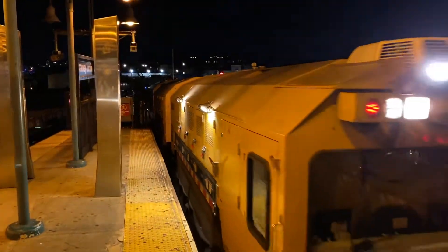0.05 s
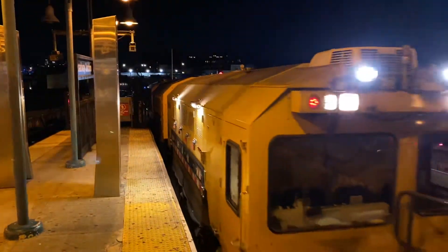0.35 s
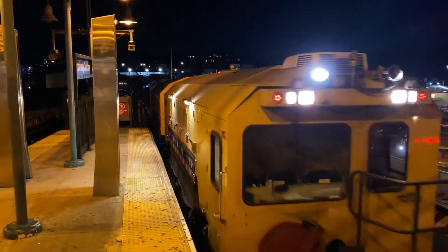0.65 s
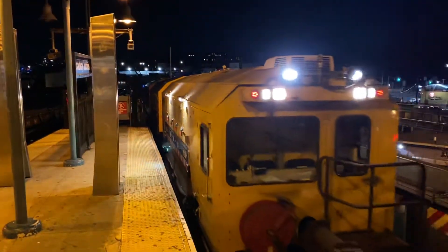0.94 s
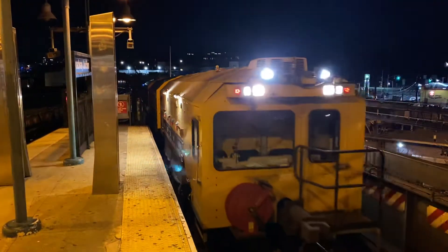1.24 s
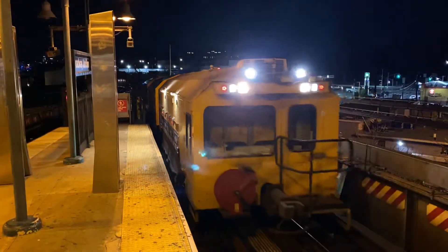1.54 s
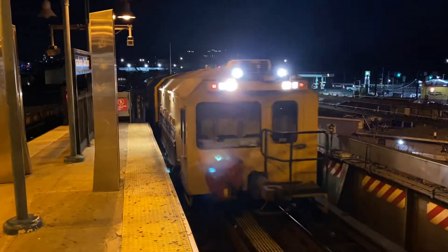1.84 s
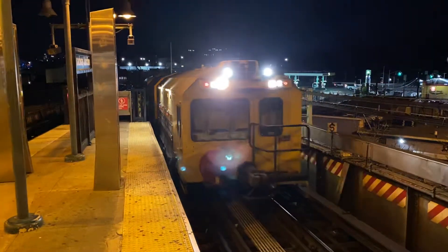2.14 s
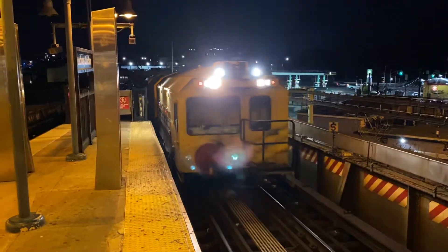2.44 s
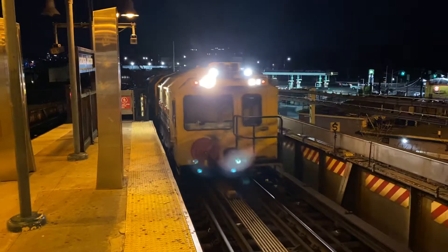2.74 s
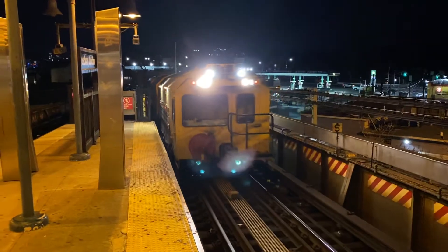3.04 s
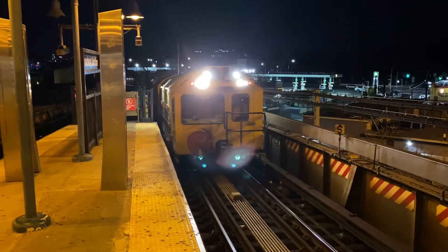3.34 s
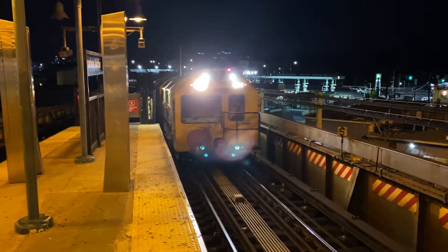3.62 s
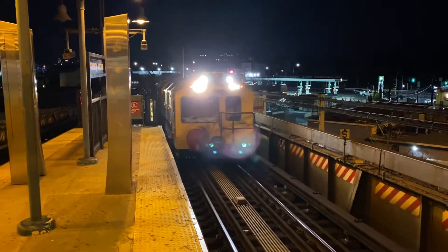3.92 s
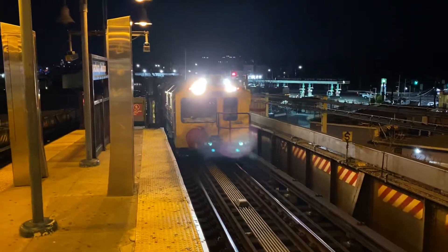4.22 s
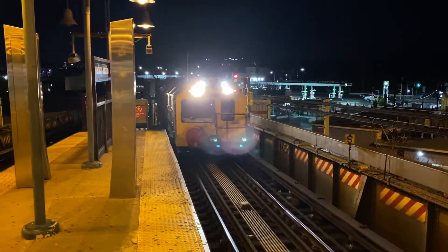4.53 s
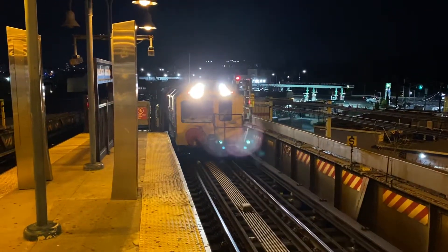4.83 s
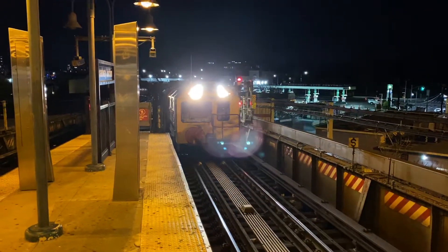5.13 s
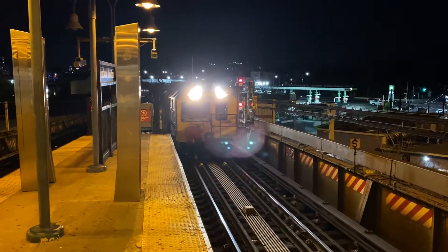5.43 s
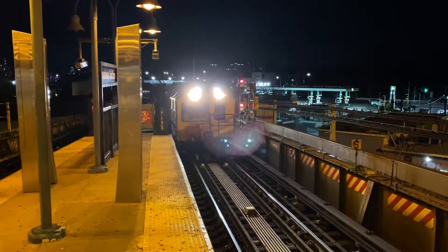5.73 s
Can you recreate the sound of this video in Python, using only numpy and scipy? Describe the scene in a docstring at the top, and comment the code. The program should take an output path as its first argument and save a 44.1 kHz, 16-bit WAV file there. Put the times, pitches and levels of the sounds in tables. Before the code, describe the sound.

A diesel work train rolls away from an open-air platform, its engine droning and whining over rumbling, hissing wheels. The wheels crash over four rail joints about a second apart, each with a deep boom and a metallic ring, while steel clinks and flanges squeak briefly. From about two seconds on, wind sputters on the microphone in gusts and puffs as the train grows fainter.

```python
"""A diesel engine drones and whines over rumbling wheels: a work train rolls away from an open platform
at night. Its wheels crash over rail joints, the treble running ahead through the rail; each blow booms
and sets the wheel ringing, and the first three also groan. Steel clinks and flanges squeak. From about
two seconds on, as the train recedes, wind sputters on the microphone in gusts and puffs."""
import sys
import numpy as np
from scipy.fft import rfft, irfft, next_fast_len
from scipy.io import wavfile
from scipy.ndimage import map_coordinates

SR = 44100
rng = np.random.default_rng(int(sys.argv[2]) if len(sys.argv) > 2 else 0)


def unload_audio(sound):
    """Save the sound as a 16-bit wav file, at the path given as the first command line argument."""
    columns = np.transpose(np.atleast_2d(sound))
    # keep every value between -1 and 1, then stretch to whole-number steps
    steps = np.round(np.clip(columns, -1, 1) * 32767)
    wavfile.write(sys.argv[1], SR, steps.astype(np.int16))


N = 254456
TIME_S = np.arange(N) / SR


def amp(db):
    """Decibels to gain."""
    return 10 ** (np.asarray(db) / 20)


def unit(x):
    """Scale to rms 1."""
    return x / np.sqrt(np.mean(x ** 2) + 1e-20)


def along(points, hz):
    """Read (freq_hz, value) points on a log frequency axis."""
    freqs, values = np.transpose(points)
    return np.interp(np.log(hz + 1), np.log(freqs + 1), values)


def eq(points):
    """A frequency response through (freq_hz, gain_db) points."""
    return lambda hz: amp(along(points, hz))


def automation(rows):
    """One curve for each column after the time."""
    times, *columns = np.transpose(rows)
    return [np.interp(TIME_S, times, column) for column in columns]


def wobble(rate):
    """A smooth random curve with rate knots a second."""
    return map_coordinates(rng.standard_normal(int(N * rate / SR) + 4), [np.arange(N) * rate / SR])


def filtered(x, response):
    """Apply a frequency response."""
    size = next_fast_len(N + SR // 2)
    return irfft(rfft(x, size) * response(np.fft.rfftfreq(size, 1 / SR)), size)[..., :N]


def stereo(pair, side_db):
    """Mid and side to left and right."""
    side = pair[1] * amp(side_db)
    return np.array([pair[0] + side, pair[0] - side])


def receding(start_db, loss_db, start_m=7.33, speed_m_per_s=2.91):
    """Level in dB of a source on the train: it loses loss_db for each doubling of the distance."""
    return start_db - loss_db * np.log2(1 + speed_m_per_s * TIME_S / start_m)


def screened(midpoint_s=3.74, spread_s=0.089, depth_db=7):
    """Level change in dB as the engine slips behind the platform's end."""
    return -depth_db * (1 + np.tanh((TIME_S - midpoint_s) / spread_s / 2)) / 2


# Low end of wind buffet and ground rumble: freq_hz, gain_db
DEEP_EQ = [(18, -15), (30, -10), (42, 10.5), (60, 20), (85, 10), (130, 8.5), (250, -63)]
def deep_noise():
    """Noise in the lowest bass, nearly alike in both ears."""
    return stereo(unit(filtered(rng.standard_normal((2, N)), eq(DEEP_EQ))), side_db=-8)


def eddies(starts_s, hz, size, cycles, port_spread):
    """Each eddy is a brief pressure swing that slows as it dies and meets the two mic ports unequally."""
    n = np.arange(SR // 25)
    skew = port_spread * rng.standard_normal((len(starts_s), 2))  # in gain and in phase
    age = hz[:, None] * n / SR  # in cycles
    phase = 4 * np.pi * np.log1p(age / 2)
    taper = np.cos(np.pi / 2 * n / len(n))
    envelope = size[:, None] * 2 * age / cycles * np.exp(1 - 2 * age / cycles) * taper
    index = ((starts_s * SR).astype(int)[:, None] + n).ravel()
    sign = rng.choice([-1, 1], (len(starts_s), 1))
    ports = [sign * envelope * np.exp(side * skew[:, :1] / 2) * np.sin(phase + side * skew[:, 1:])
             for side in (1, -1)]
    return np.array([np.bincount(index, port.ravel(), N)[:N] for port in ports])


def sputter(level_db, pitch_hz, scatter, count):
    """A stream of eddies of random pitch whose strength follows the gusts."""
    at = ((np.arange(count) + rng.uniform(0, 1, count)) / count * (N - 1)).astype(int)
    detune = np.exp(scatter * np.clip(rng.standard_normal(count), -2, 2))
    size = unit(amp(3.4 * np.minimum(rng.exponential(1, count), 3))) * detune ** -.3
    hz = np.broadcast_to(pitch_hz, N)[at] * detune
    return eddies(at / SR, hz, size * amp(level_db[at]), cycles=1.02, port_spread=0.63)


# Gusts on the mic: peak_s, half_length_s, buffet_db, large_eddy_db, small_eddy_db, small_eddy_hz
GUSTS = [(1.91, 0.11, -33, -29.5, -25.5, 384), (2.736, 0.049, -20, -21.5, -23.5, 375),
         (2.89, 0.25, -36, -18.5, -25, 378), (3.12, 0.029, -36, -29, -26, 332),
         (3.41, 0.08, -31, -15.5, -24.5, 405), (3.636, 0.19, -30, -19, -27.5, 360),
         (4.007, 0.17, -51, -44, -24, 377), (4.46, 0.2, -54, -27.5, -29, 476),
         (4.786, 0.052, -41, -24.5, -39, 587), (5.195, 0.0098, -46, -21, -50, 550),
         (5.456, 0.081, -43, -23, -20.5, 570), (5.634, 0.0088, -45, -17, -17, 690),
         (5.728, 0.046, -56, -18.5, -20, 770)]
def wind():
    """Each gust swells and fades, bringing a deep buffet and a stream of large and small eddies."""
    peak_s, half_s, buffet_db, large_db, small_db, small_hz = np.transpose(GUSTS)
    swell = 1 / (1 + ((TIME_S - peak_s[:, None]) / half_s[:, None]) ** 2) ** 2
    level = lambda db: 10 * np.log10(amp(db) ** 2 @ swell)  # gusts add in power
    large = sputter(level(large_db), pitch_hz=207, scatter=0.36, count=850)
    small = sputter(level(small_db), small_hz @ swell / swell.sum(axis=0), scatter=0.29, count=1200)
    return deep_noise() * amp(level(buffet_db)) + large + small


# Single pops of wind: start_s, base_level_db, base_pitch_hz
PUFFS = [(1.877, -19, 265), (1.927, -24, 250), (2.719, -16, 252), (2.767, -30, 275), (2.791, -19, 240),
         (2.9, -15.5, 318), (2.953, -26, 250), (2.99, -18.5, 292), (3.35, -17.5, 300), (3.416, -16.5, 260),
         (3.435, -18.5, 280), (3.598, -18, 248), (3.665, -25, 244), (4.078, -28, 282), (4.205, -36, 330),
         (4.436, -28.5, 413), (4.518, -25.5, 413), (4.637, -20.5, 393), (4.692, -21, 430),
         (4.746, -35, 373), (4.787, -24, 356), (5.186, -27, 350), (5.279, -27, 350), (5.44, -23, 300),
         (5.453, -22, 520), (5.636, -24, 380), (5.68, -23, 326), (5.731, -22.5, 543)]
def puffs():
    """A strong puff is one eddy with a smaller, quicker one at its front."""
    start_s, db, hz = np.transpose(PUFFS)
    front = eddies(start_s, hz * 1.7, amp(db - 5), cycles=1.1, port_spread=.3)
    body = eddies(start_s, hz * 1.244, amp(db + 5), cycles=1.28, port_spread=0.45)
    return front + body


# Stereo width of the steel: freq_hz, side_gain_db
STEEL_WIDTH = [(60, -14), (200, -11), (700, -6.5), (1400, -3.5), (2400, -4), (4400, -3), (6000, -1.5),
               (8000, -6), (10000, -13)]
def steel_noise(colour, ripple_db, spacing_hz):
    """Mid and side noise rung through dense, irregular resonances; the mid has rms 1."""
    def response(hz):
        place = np.log1p(hz / 2500) * 2500 / spacing_hz  # resonances thin out in the treble
        modes = [map_coordinates(rng.standard_normal(int(place[-1]) + 4), [place]) for _ in range(2)]
        width = [np.ones_like(hz), amp(along(STEEL_WIDTH, hz))]
        return colour(hz) * amp(ripple_db * np.array(modes)) * width
    pair = filtered(rng.standard_normal((2, N)), response)
    return pair / np.std(pair[0])


ROAR_DB, ROAR_LOSS_DB = -27, 6.5
# Body of the rolling bed: freq_hz, gain_db
ROAR_EQ = [(120, -30.5), (200, -7), (280, -8.5), (400, -12), (700, -15.5), (1130, -24.5), (1580, -22.5),
           (1800, -26.5), (2200, -25.5), (2600, -31), (3200, -37), (6000, -62)]
# Hiss of wheel on rail: freq_hz, gain_db
HISS_EQ = [(1500, -30), (3200, -1), (4600, 1.5), (5300, -3), (7300, -1.5), (8600, -8), (10500, -11),
           (11500, -16), (14000, -17), (15000, -22), (15700, -36)]
# Top of the hiss, soon lost in the air: freq_hz, gain_db
SIZZLE_EQ = [(5000, -30), (7500, 0), (10000, -1), (12000, -6), (14500, -3), (15600, -20)]
def rolling():
    """Rough wheels shake rails, cars and ground; the sound grows fainter and wider with distance."""
    roar = steel_noise(eq(ROAR_EQ), ripple_db=1.5, spacing_hz=16)
    hiss = steel_noise(eq(HISS_EQ), ripple_db=2.3, spacing_hz=15)
    roar *= amp(receding(ROAR_DB, ROAR_LOSS_DB) + wobble(16))
    hiss *= amp(receding(-49.5, loss_db=8) + wobble(20) + 0.2 * wobble(3.6))
    sizzle = steel_noise(eq(SIZZLE_EQ), ripple_db=2, spacing_hz=15)
    sizzle *= amp(receding(-58.5, loss_db=13.5) + wobble(20))
    ground = deep_noise() * amp(receding(-28, loss_db=3.5) + screened() + 2.5 * wobble(6.46))
    side_db = -0.2 - 4.8 * np.exp(-TIME_S / 0.41)
    return stereo(roar + hiss + sizzle, side_db) + ground


def tone(phase, flutter, side_db, flutter_hz=9):
    """A tone whose strength and direction flutter as its reflections shift."""
    reflections = np.array([wobble(flutter_hz) + 1j * wobble(flutter_hz) for _ in range(2)])
    paths = flutter * reflections + [[1], [0]]  # the direct sound is in the mid only
    pair = np.real(paths * np.exp(1j * (phase + rng.uniform(0, 2 * np.pi))))
    return stereo(pair / np.std(pair[0]), side_db)


def shaft_phase(drift, drift_hz):
    """Phase of a 1 Hz rotation whose speed wanders slightly."""
    return 2 * np.pi * np.cumsum(1 + drift * wobble(drift_hz)) / SR


CRANK_HZ = 29.87
# Exhaust fader moves while the engine is close: time_s, second_order_db, third_order_db
EXHAUST_LEVELS = [(0.0, -24.5, -25), (0.3, -29, -29.5), (0.62, -27.5, -21), (1.1, -28.5, -26),
                  (1.55, -22.5, -30), (1.8, -30, -33), (2.4, -29, -31.5)]
# Exhaust notes: crank_multiple, fade_db_per_s
EXHAUST_ORDERS = [(2, 7.5), (3, 9)]
def exhaust(turn):
    """The exhaust drones on two crank orders, which fade once the engine has passed."""
    passed_s = np.maximum(TIME_S - EXHAUST_LEVELS[-1][0], 0)
    return sum(amp(db - fade * passed_s + screened())
               * tone(order * CRANK_HZ * turn, flutter=0.08, side_db=-0.5)
               for (order, fade), db in zip(EXHAUST_ORDERS, automation(EXHAUST_LEVELS)))


# Rumble of the casing: freq_hz, gain_db
CASING_EQ = [(35, -9.5), (60, 7), (90, 6), (130, 7), (175, 12), (230, -3), (400, -70)]
# Hum within that rumble: crank_multiple, relative_db
CASING_ORDERS = [(4, -11), (5, -15), (6, -15), (7, -18), (8, -15)]
def casing(turn):
    """The engine casing rumbles and hums at multiples of the crank speed."""
    rumble = stereo(steel_noise(eq(CASING_EQ), ripple_db=4, spacing_hz=10.9), side_db=-10)
    hum = sum(amp(db) * tone(order * CRANK_HZ * turn, flutter=0.73, side_db=-4)
              for order, db in CASING_ORDERS)
    return amp(receding(-26, loss_db=2.5) + screened()) * (rumble + hum)


# Engine tones that carry far: pitch_hz, relative_db
UPPER_TONES = [(268.8, 2), (358.4, -8.5), (537, -16)]
# Their fader moves: time_s, gain_db
UPPER_SWELL = [(0, -5.5), (1.7, -1.5), (2.2, 2), (4.1, 7), (4.5, -16)]
def upper_tones(turn):
    """Higher tones swell once the engine's end faces the platform, then drop away."""
    tones = sum(amp(db) * tone(hz * turn, flutter=0.91, side_db=-10, flutter_hz=22)
                for hz, db in UPPER_TONES)
    return amp(receding(ROAR_DB - 8, ROAR_LOSS_DB) + automation(UPPER_SWELL)[0]) * tones


# Fan harmonics: blade_rate_multiple, relative_db
FAN_ORDERS = [(1, -2.5), (4, -11.5), (5, -13), (6, -15.5), (8, -22), (9, -18)]
def fan(blade_hz=173.4):
    """The cooling fan whines at multiples of its blade rate."""
    phase = blade_hz * shaft_phase(drift=0.003, drift_hz=4)
    whine = sum(amp(db + 2.5 * wobble(2.4)) * tone(order * phase, flutter=0.73, side_db=2, flutter_hz=14)
                for order, db in FAN_ORDERS)
    return amp(receding(ROAR_DB - 7, ROAR_LOSS_DB + 1)) * whine


# Gear whine: pitch_hz, start_level_db
GEAR_TONES = [(1335, -54), (1615, -58), (2939, -66), (3478, -67), (6600, -79)]
def gears(turn):
    """The gears add a thin whine that fades with distance."""
    whine = sum(amp(db) * tone(hz * turn, flutter=0.8, side_db=1) for hz, db in GEAR_TONES)
    return amp(receding(0, loss_db=7)) * whine


def engine():
    """The diesel: all but the fan follows one slightly unsteady crank."""
    turn = shaft_phase(drift=0.001187, drift_hz=3)
    return exhaust(turn) + casing(turn) + upper_tones(turn) + fan() + gears(turn)


# Flanges rubbing the rail: peak_s, half_length_s, pitch_hz, half_width_ratio, level_db
SQUEAKS = [(0.127, 0.012, 3160, .012, -42.5), (0.165, 0.012, 3120, .015, -47),
           (0.411, .024, 1440, .3, -30.5), (0.433, 0.014, 2800, 0.33, -36.5), (1.449, .008, 4600, .05, -41),
           (2.596, 0.03, 2700, .4, -33), (3.779, 0.033, 2170, 0.47, -35.5), (4.032, 0.016, 4020, .035, -55),
           (4.035, .025, 7000, .03, -62), (5.36, 0.071, 4770, .55, -54)]
def squeaks(chatter_db=3):
    """The flange sticks and slips: a rough noise band, narrow for a squeak and broad for a scrape."""
    sound = np.zeros((2, N))
    for peak_s, half_s, hz, width, db in SQUEAKS:
        band = filtered(rng.standard_normal((2, N)), lambda f: 1 / (1 + ((f - hz) / (width * hz)) ** 4))
        rub = unit(band * amp(chatter_db * wobble(350)))
        swell = np.exp(-((TIME_S - peak_s) / half_s) ** 2)
        sound += amp(db) * swell * stereo(rub, side_db=-6)
    return sound


def contact(start_s, rise_s, hold_s, decay_s, sag_db=4, full_hold_s=0.064):
    """Envelope of a steel contact: it swells, sags and rings out; a tap dies sooner than a full blow."""
    age = TIME_S - start_s
    held_db = sag_db * (.5 - np.clip((age - rise_s) / hold_s, 0, 1))
    t60_s = decay_s * np.sqrt(hold_s / full_hold_s)
    release_db = -60 * np.maximum(age - rise_s - hold_s, 0) / t60_s
    return np.clip(age / rise_s, 0, 1) * amp(held_db + release_db)


# Rail groans at the first three joint hits: start_s, hold_s, level_db, start_hz, end_hz
GROANS = [(0.388, 0.083, -26, 615, 303), (1.395, 0.039, -21, 703, 339.3), (2.544, 0.024, -23.5, 1000, 602),
          (2.549, 0.011, -23, 467.6, 380), (2.587, 0.034, -18, 419.3, 306)]
def groans(rise_s=0.0068, fall_s=0.032):
    """Low bending waves travel slowest in the rail, so a blow arrives as a rough, falling tone."""
    sound = np.zeros(N)
    for start_s, hold_s, db, start_hz, end_hz in GROANS:
        age = np.maximum(TIME_S - start_s, 0)
        hz = end_hz + (start_hz - end_hz) * np.exp(-age / fall_s)
        phase = 2 * np.pi * np.cumsum(hz * (1 + .17 * wobble(500))) / SR
        rough = np.sin(phase) * unit(amp(2.5 * wobble(200)))
        sound += amp(db) * contact(start_s, rise_s, hold_s, decay_s=0.32) * rough
    return sound


def ringing(modes, start_s, width_hz, scatter_db):
    """Struck steel: each mode is a slightly rough tone with a new strength and direction at every blow."""
    hz, db = np.transpose(modes)
    start = int(start_s * SR)
    n = np.arange(min(SR // 2, N - start))
    walk = np.cumsum(rng.standard_normal((len(hz), SR // 2)), axis=1)[:, n]
    phase = 2 * np.pi * (hz[:, None] * n / SR + rng.uniform(0, 1, (len(hz), 1)))
    phase += walk * np.sqrt(2 * np.pi * width_hz / SR)
    gain = np.sqrt(2) * amp(db + scatter_db * rng.standard_normal(len(hz)))
    left_lead = .5 * rng.standard_normal((len(hz), 1))
    sound = np.zeros((2, N))
    sound[:, start + n] = [gain @ np.sin(phase + side * left_lead) for side in (1, -1)]
    return sound


CLINK_RISE_SHARE = 0.2  # of the hold
# Sharp steel clinks and ticks, some of them the hard edge of a joint hit:
# start_s, hold_s, level_db, tilt_db_per_octave
CLINKS = [(0.405, 0.017, -51, -4.5), (0.423, 0.043, -38.5, 11), (1.414, 0.015, -34, 2.5),
          (1.445, 0.015, -41, 6), (1.49, 0.019, -35.5, 3.5), (1.532, 0.02, -35.5, 4.5),
          (1.574, 0.079, -44, 11), (2.101, 0.002, -35, 12), (2.102, 0.015, -41, 1.5),
          (2.539, 0.01, -31, -0.5), (2.902, 0.028, -45, 1), (3.734, 0.0099, -42, 16),
          (3.992, 0.096, -48.5, 0.5)]
# Their ring: pitch_hz, relative_db
CLINK_MODES = [(2606, -3), (3042, -2), (3510, -2), (4102, -2), (4600, -1), (4950, -3)]
def clink_ring(ring_db=-20.5, pitch_spread=0.029):
    """Every clink leaves steel ringing, each time at a slightly different pitch."""
    detunes = np.exp(pitch_spread * rng.standard_normal(len(CLINKS)))
    sound = np.zeros((2, N))
    for (start_s, hold_s, db, _), detune in zip(CLINKS, detunes):
        ring = ringing(np.multiply(CLINK_MODES, [detune, 1]), start_s, width_hz=110, scatter_db=2)
        envelope = contact(start_s, CLINK_RISE_SHARE * hold_s, hold_s, decay_s=0.65)
        sound += amp(db + ring_db) * envelope * ring
    return sound


LEAD_S, CRASH_RISE_S = 0.019, 0.012  # the tick runs ahead through the rail; the crash follows
# Wheels hitting rail joints: start_s, tick_rise_s, hold_s, tick_db, crash_db,
# crash_tilt_db_per_octave, thud_db, ring_db, boom_db, boom_hz
JOINTS = [(0.364, .004, 0.073, -36, -41, 0.5, -26, -38, -20.5, 141.4),
          (1.376, .012, 0.05, -53, -40.5, 2, -24, -39.5, -18, 75),
          (2.522, 0.0099, 0.054, -34.5, -33, 2.5, -18.5, -31, -18, 78.7),
          (3.712, 0.029, 0.12, -38.5, -47.5, 0.8, -32, -50, -38, 80.5)]
def booms():
    """Each joint bounces the truck on its springs, at a pitch that differs from wheel to wheel."""
    return sum(amp(db) * contact(start_s + LEAD_S, rise_s=0.006, hold_s=0.022, decay_s=0.65)
               * np.sqrt(2) * np.sin(2 * np.pi * hz * (TIME_S - start_s))
               for start_s, *_, db, hz in JOINTS)


# Clang of a struck wheel: pitch_hz, relative_db
WHEEL_MODES = [(738, -1), (850, -5.5), (1040, -9), (1150, -13), (1280, -12), (1410, -9.5), (1545, -7),
               (2000, -11), (2120, -11), (2615, -15), (3492, -15), (4135, -17.5), (4375, -17.5),
               (6577, -19)]
def wheel_ring():
    """The blow of each joint sets the wheel ringing."""
    return sum(amp(ring_db) * contact(start_s + LEAD_S, CRASH_RISE_S, hold_s, decay_s=0.48)
               * ringing(WHEEL_MODES, start_s, width_hz=22, scatter_db=1.5)
               for start_s, _, hold_s, *_, ring_db, _, _ in JOINTS)


# Noise bands of an impact, low to high: low_hz, high_hz, decay_s, side_db, chatter_db
IMPACT_BANDS = [(255, 760, .36, -3, 1.6), (830, 2500, .42, -2, 1.8), (2700, 4800, .42, -2, 1.7),
                (6000, 10000, .32, -1, 1.9), (13000, 15500, .26, 0, 2.2)]
# EQ of each kind of hit, one row a band: tick_db, crash_db, clink_db
IMPACT_EQ = [(7.5, 0, -7), (-6, 8, 2.5), (-24, -0.5, -7.5), (-4.5, -10.5, -24), (-16, -24, -45)]
def clacks(tick_hold_s=0.024, thud_trim_db=-6, echo_db=-19):
    """Joint hits and clinks excite five bands of scraping noise; the yard echoes every crash."""
    sound = np.zeros((2, N))
    for band, (low_hz, high_hz, decay_s, side_db, chatter_db) in enumerate(IMPACT_BANDS):
        tick_eq, crash_eq, clink_eq = IMPACT_EQ[band]
        octaves = np.log2(low_hz / IMPACT_BANDS[2][0])  # tilts pivot on the middle band
        hits = []
        for start_s, tick_rise_s, hold_s, tick_db, crash_db, tilt, thud_db, *_ in JOINTS:
            crash = amp(crash_db + crash_eq + tilt * octaves)
            thud = amp(thud_db + thud_trim_db) * (band == 0)
            hits += [amp(tick_db + tick_eq) * contact(start_s, tick_rise_s, tick_hold_s, decay_s),
                     np.hypot(crash, thud) * contact(start_s + LEAD_S, CRASH_RISE_S, hold_s, decay_s),
                     crash * amp(echo_db) * contact(start_s + LEAD_S, hold_s, hold_s, decay_s=1.2)]
        for start_s, hold_s, db, tilt in CLINKS:
            clink = amp(db + clink_eq + tilt * octaves)
            hits.append(clink * contact(start_s, CLINK_RISE_SHARE * hold_s, hold_s, decay_s))
        envelope = np.linalg.norm(hits, axis=0)  # hits add in power

        def bandpass(hz):
            skirts = (1 + (low_hz / (hz + 1)) ** 10) * (1 + (hz / high_hz) ** 12)
            return 1 / np.sqrt(skirts * (1 + hz / low_hz))
        chatter = unit(amp(chatter_db * wobble(300)))
        sound += stereo(envelope * chatter * steel_noise(bandpass, ripple_db=2, spacing_hz=30), side_db)
    return sound


def scene():
    """The train and the wind together."""
    bed = engine() + rolling()
    impacts = clacks() + wheel_ring() + clink_ring() + booms() + groans()
    return bed + impacts + squeaks() + wind() + puffs()


# Phase between left and right; the treble turns wide and hollow near 8.5 and 12 kHz:
# freq_hz, left_lead_rad
STEREO_PHASE = [(900, 0), (1380, -.5), (2150, .35), (3700, .8), (6500, .5), (7600, -1), (8500, -np.pi),
                (9700, -2 * np.pi), (11000, -2 * np.pi), (11700, -3 * np.pi), (12500, -3 * np.pi),
                (13300, -4 * np.pi)]
# The left mic port is more sensitive around 6 kHz: freq_hz, left_minus_right_db
PORT_BALANCE = [(60, 0), (150, -1), (380, 0.5), (950, 0.5), (2380, 0.0), (5980, 5.5), (10000, -1.5)]
def record(dry, low_cut_hz=36, top_hz=15750):
    """Left and right differ in phase and level and share a treble resonance and steep band limits."""
    def response(hz):
        split = np.array([[.5], [-.5]])
        image = np.exp(1j * split * along(STEREO_PHASE, hz)) * amp(split * along(PORT_BALANCE, hz))
        resonance = amp(3 * np.exp(-((hz - 8200) / 650) ** 2))
        low_cut = 1 / np.sqrt(1 + (low_cut_hz / (hz + 1)) ** 8)
        return image * resonance * low_cut * (hz < top_hz)
    return filtered(dry, response)


dry = scene()
out = record(dry)
unload_audio(out)
```